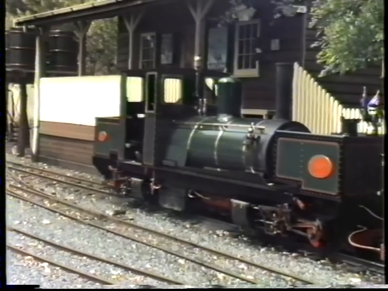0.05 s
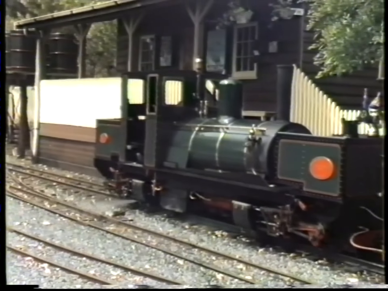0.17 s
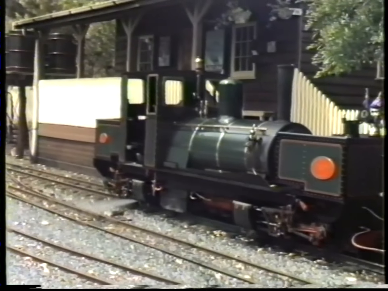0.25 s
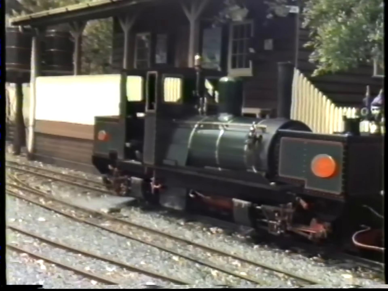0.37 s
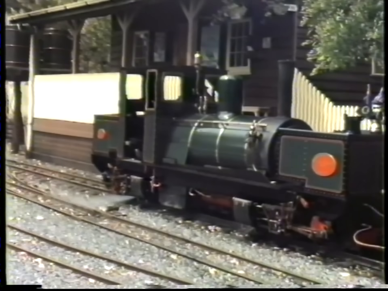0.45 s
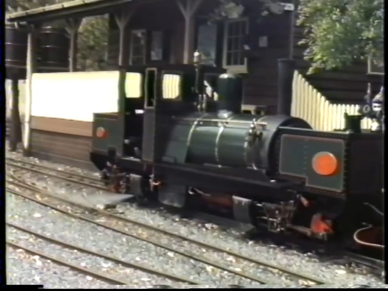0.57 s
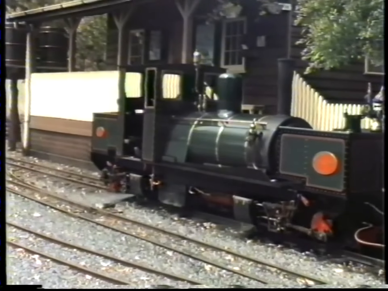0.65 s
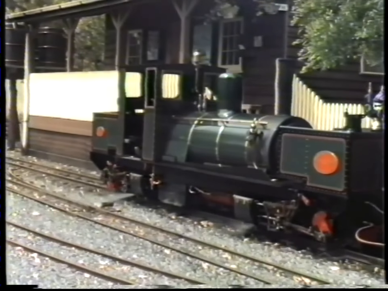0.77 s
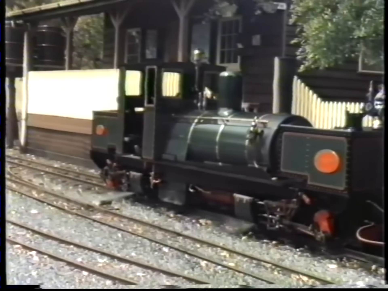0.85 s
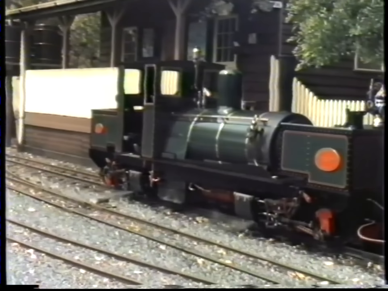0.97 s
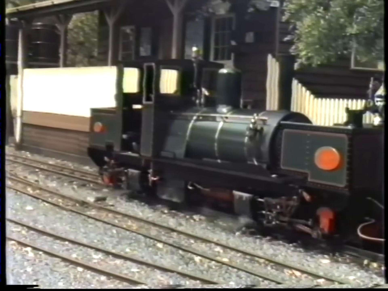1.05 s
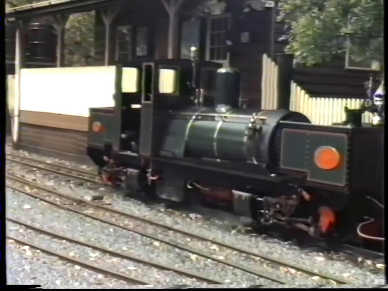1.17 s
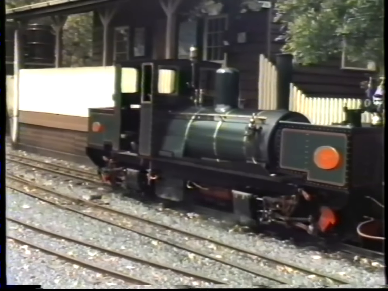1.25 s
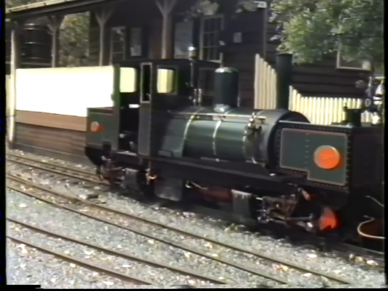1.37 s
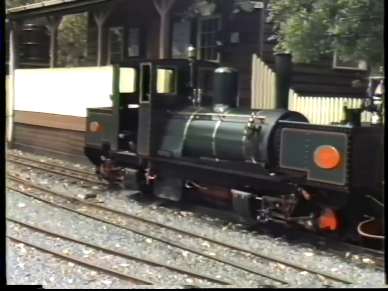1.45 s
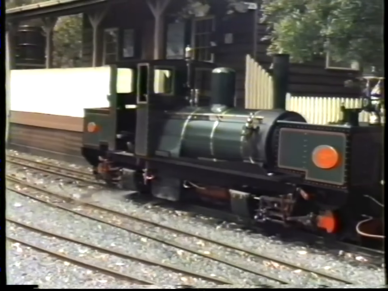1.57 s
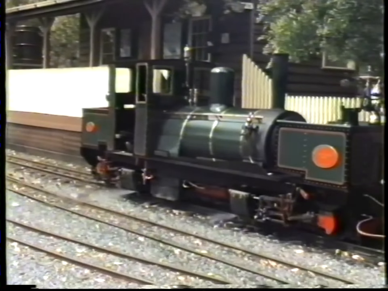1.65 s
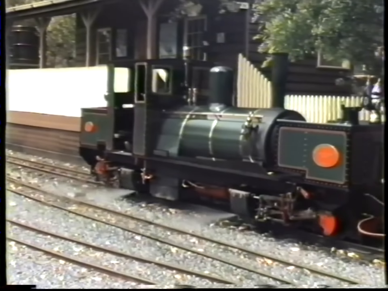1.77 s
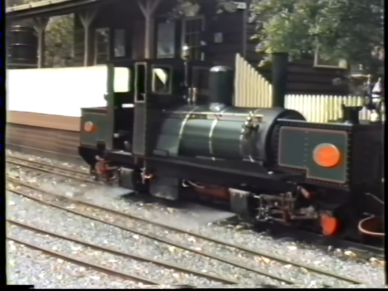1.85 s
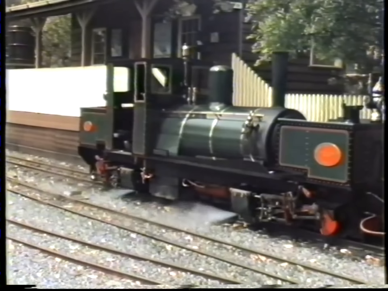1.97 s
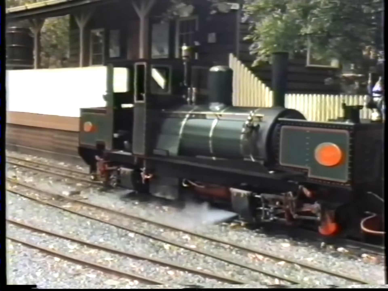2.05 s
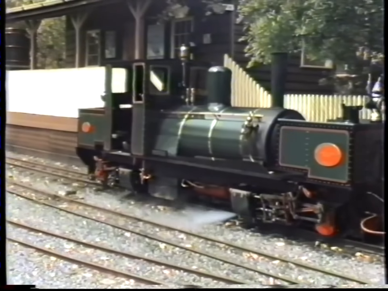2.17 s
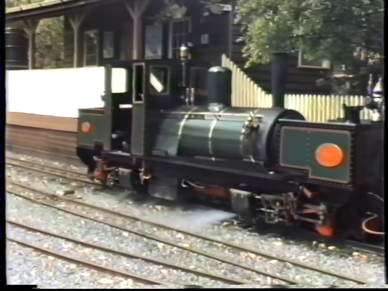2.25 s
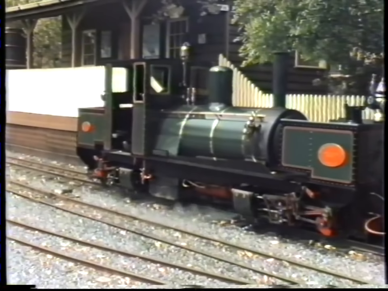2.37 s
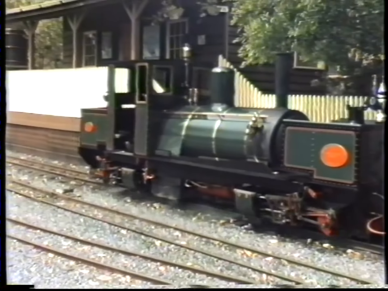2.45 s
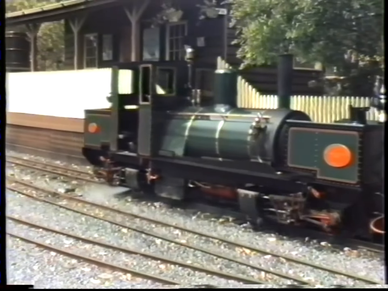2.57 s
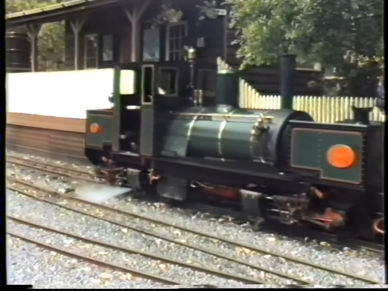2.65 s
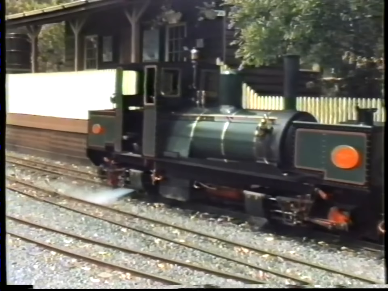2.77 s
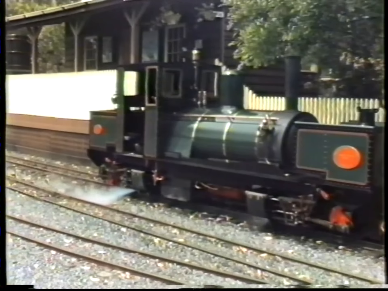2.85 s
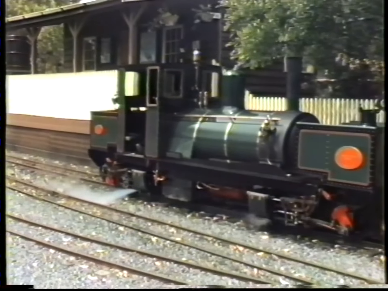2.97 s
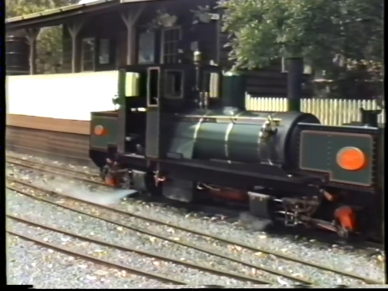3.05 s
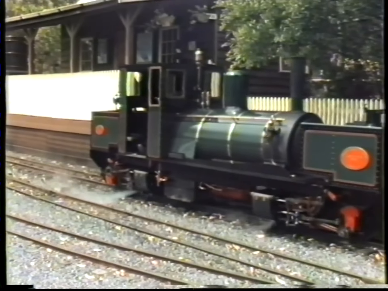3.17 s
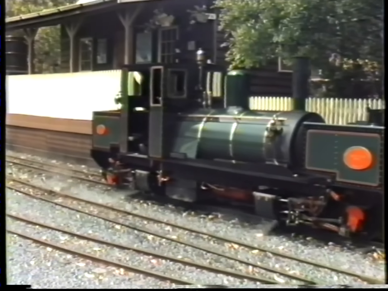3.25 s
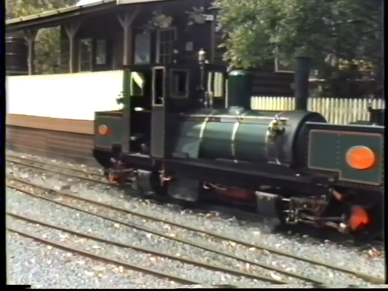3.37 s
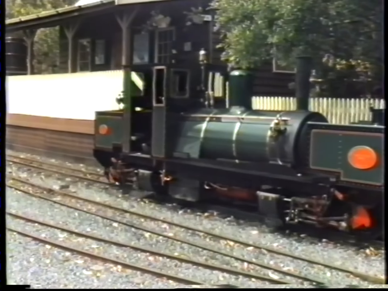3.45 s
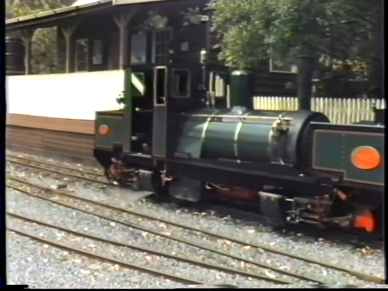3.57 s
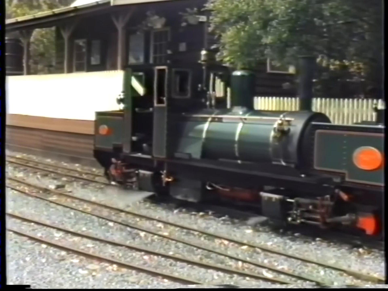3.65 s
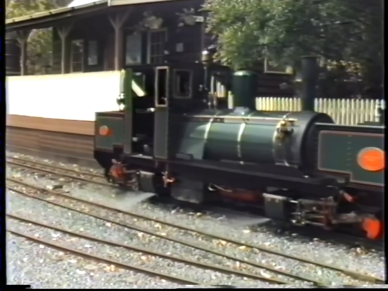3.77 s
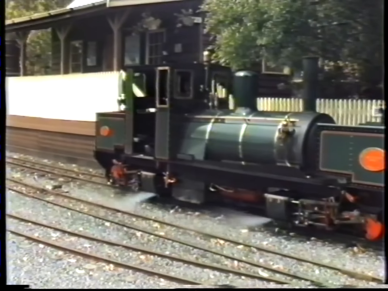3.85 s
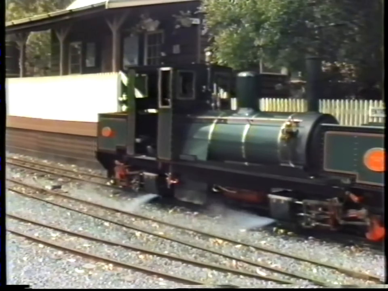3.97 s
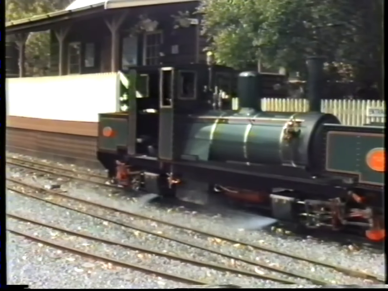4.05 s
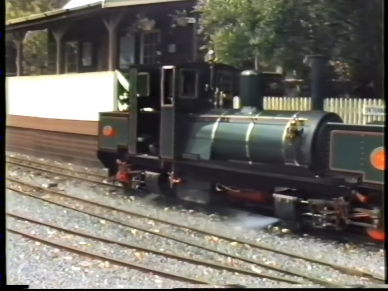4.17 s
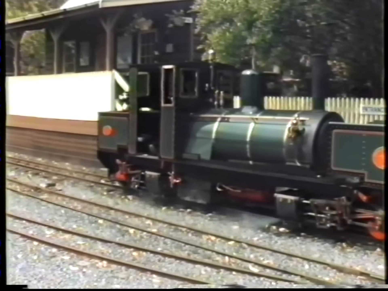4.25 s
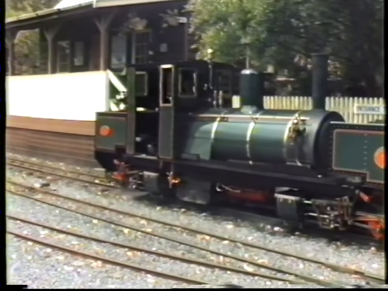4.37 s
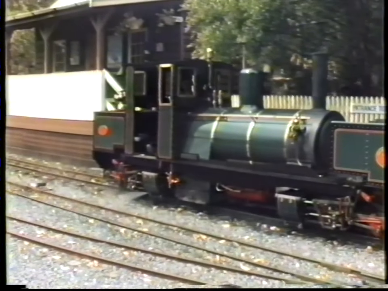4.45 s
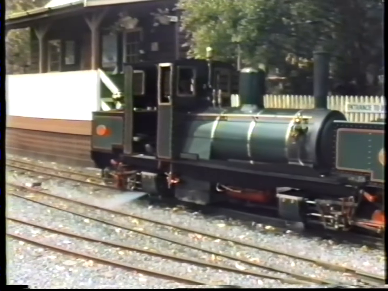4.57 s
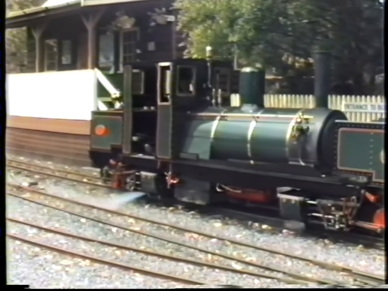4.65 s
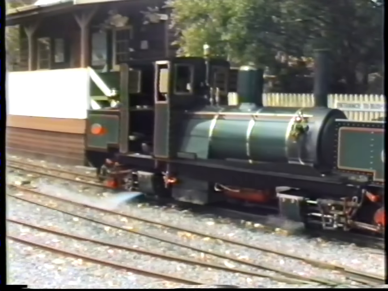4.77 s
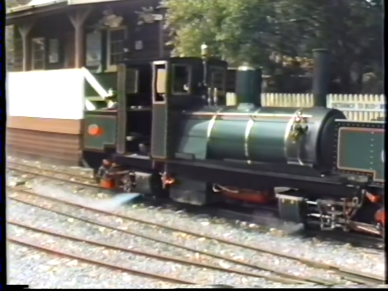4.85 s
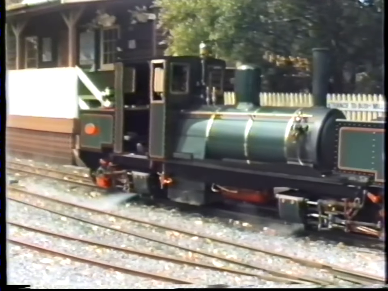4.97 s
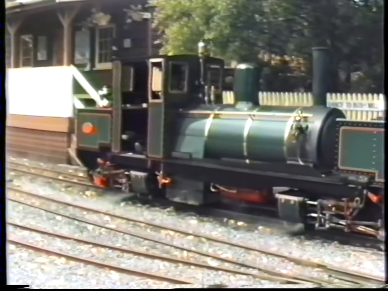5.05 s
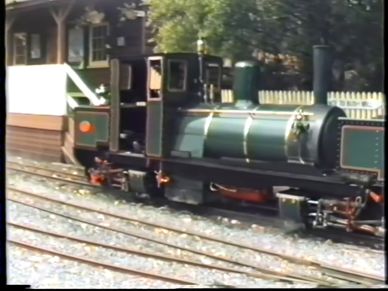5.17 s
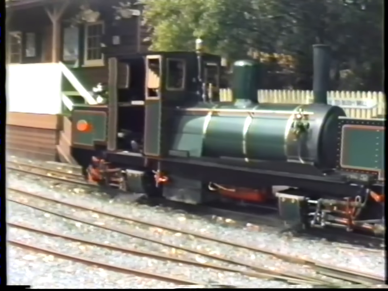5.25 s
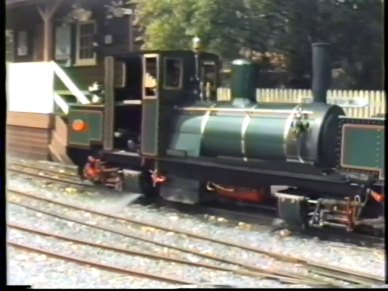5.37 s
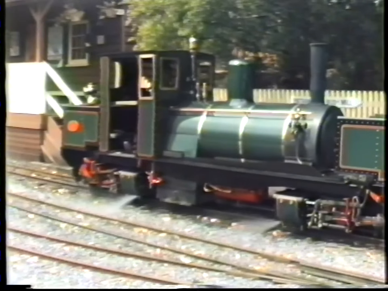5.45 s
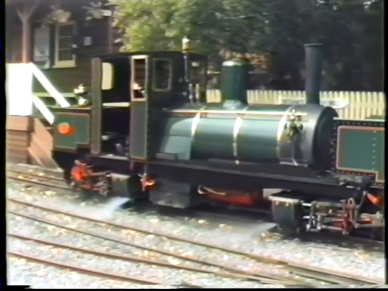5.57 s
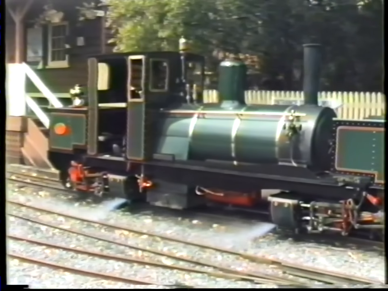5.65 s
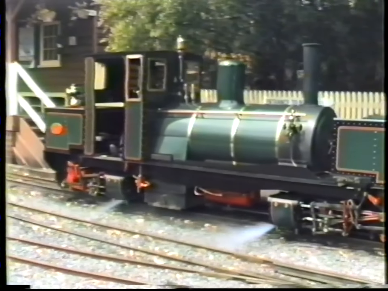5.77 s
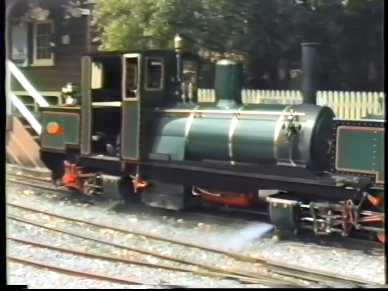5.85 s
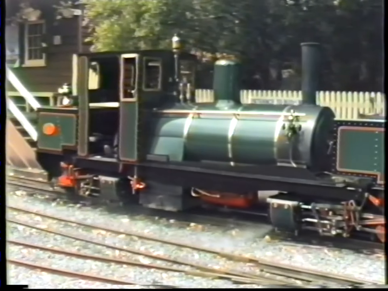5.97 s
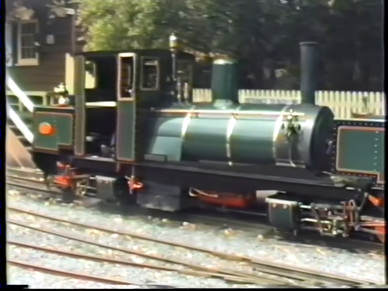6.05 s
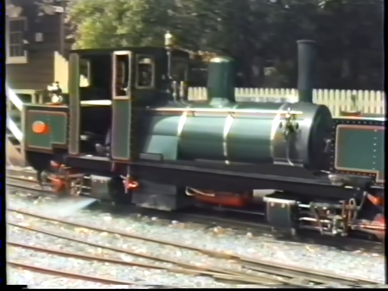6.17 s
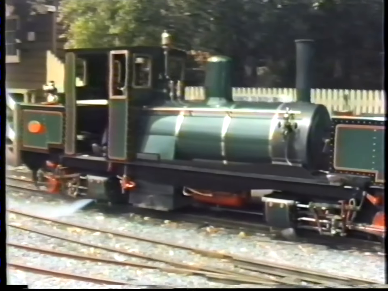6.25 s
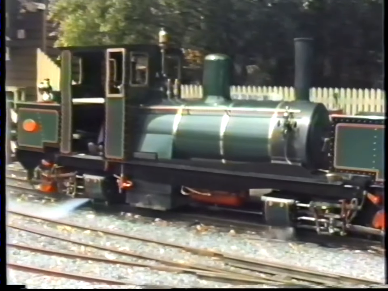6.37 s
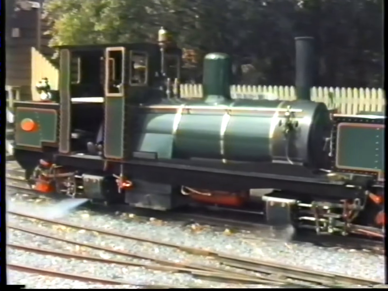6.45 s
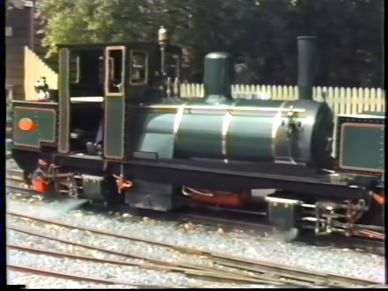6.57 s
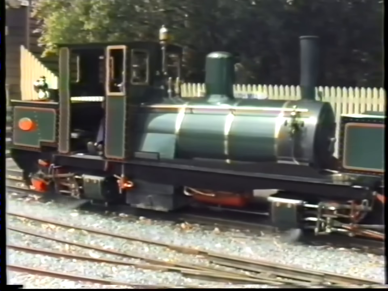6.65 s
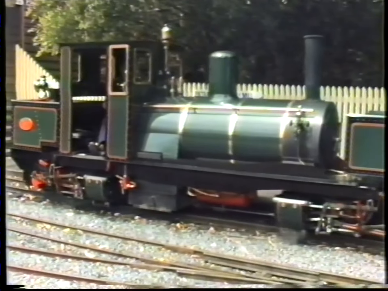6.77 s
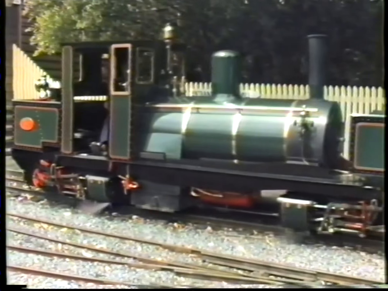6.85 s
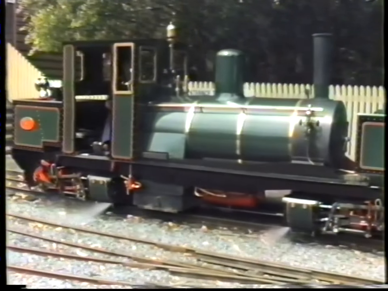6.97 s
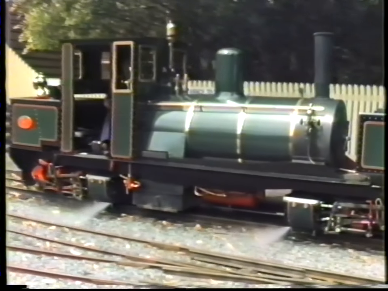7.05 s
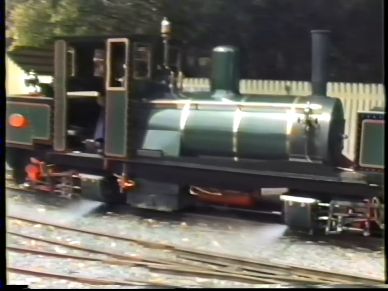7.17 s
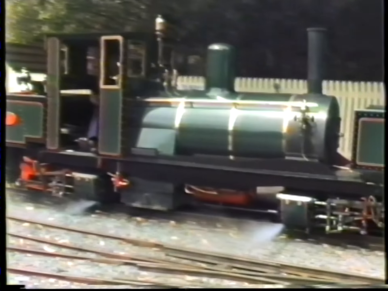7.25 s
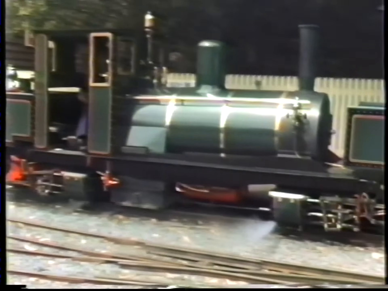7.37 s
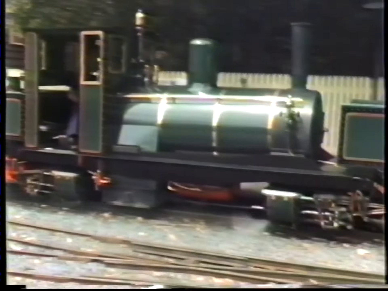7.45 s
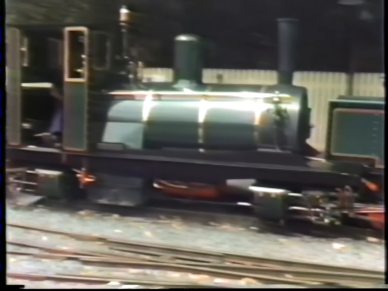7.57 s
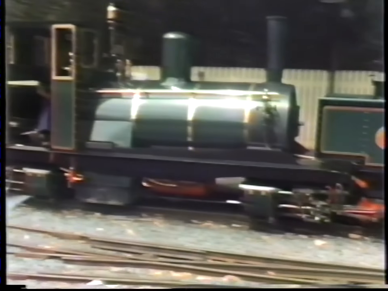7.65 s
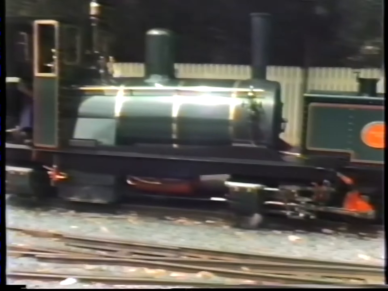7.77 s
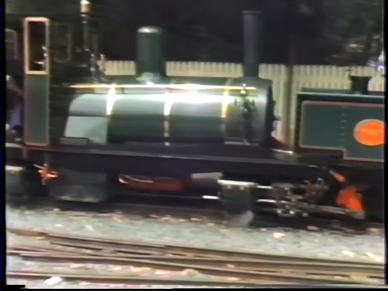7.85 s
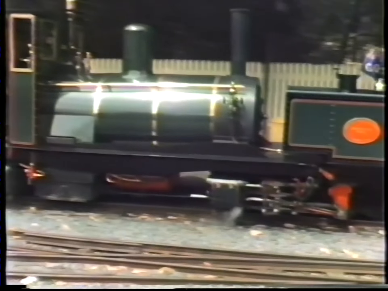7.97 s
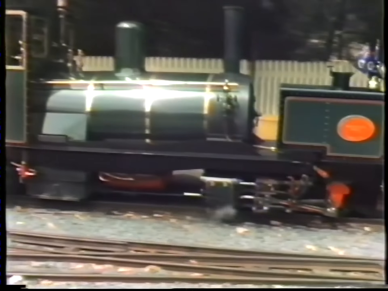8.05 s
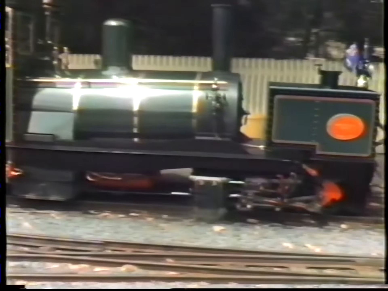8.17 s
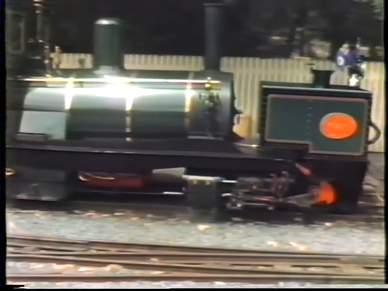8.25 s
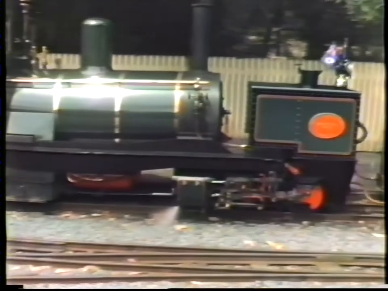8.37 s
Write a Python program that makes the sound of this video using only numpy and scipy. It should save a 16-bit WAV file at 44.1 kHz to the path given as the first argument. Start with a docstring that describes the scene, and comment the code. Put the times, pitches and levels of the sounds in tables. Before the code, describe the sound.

A small steam locomotive moves off, hissing in spitting bursts over faint chuffs and wheel rumble, with wind buffeting the microphone.

```python
"""A small steam locomotive pulls away from a station with its cylinder drain cocks open.
Steam leaks from the start, then hisses out at each piston stroke, spitting water, over short low chuffs.
After a second, gusts begin to buffet the microphone. From about four seconds the engine is nearer:
the jets blow harder, the wheels rumble louder and the wind is at its strongest.
Throughout, a mono tape camera adds hum, hiss and its line-scan whine."""
import sys
import numpy as np
from scipy import signal
from scipy.fft import rfft, irfft, next_fast_len
from scipy.io import wavfile
from scipy.ndimage import uniform_filter1d

SR = 44100
rng = np.random.default_rng(int(sys.argv[2]) if len(sys.argv) > 2 else 0)


def generate_wav(signal):
    """Clip the signal to [-1, 1] and save it as 16-bit WAV at the path in sys.argv[1]."""
    frames = np.transpose(np.atleast_2d(signal))
    scaled = np.clip(frames, -1, 1) * 32767
    pcm = np.round(scaled).astype(np.int16)
    wavfile.write(sys.argv[1], SR, pcm)


N = 370881
SIZE = next_fast_len(N)
HZ = np.maximum(np.arange(SIZE // 2 + 1) * SR / SIZE, 1)
TICKS = np.arange(0, N + 64, 64) / SR   # envelope times in seconds


# Colour of the steam. Each row: frequency in Hz, relative level in dB.
STEAM_COLOUR = [(410, -20.5), (700, -30), (893, -13), (1720, -11), (2190, -5), (3760, -1.5), (5520, -4.5),
                (7510, -1.5), (9330, -4), (11000, -11.5), (14100, -40.5), (15000, -41)]
# Peaks in the tone of the hiss, shifting in strength from blow to blow.
# Each row: centre in Hz, half width in Hz.
HISS_PEAKS = [(1450, 310), (3900, 540), (5150, 530), (6250, 390), (7400, 780), (9000, 440)]

def steam_jets(sputter_db, patchy_db):
    """Turbulent steam; water in the cocks makes it sputter, in all bands together and in each alone."""
    roar_db, dull_db, bright_db, peaks_db = steam_levels()
    mean_db = np.mean([dull_db.mean(), bright_db.mean()])

    def level_db(hz):
        """Crossfade the envelopes of the roar (1-2.2 kHz), dull jet (2.5-5.5) and bright jet (6-11)."""
        low = np.clip(np.log2(2900 / hz) / 0.87, 0, 1)
        high = np.clip(np.log2(hz / 4300) / 1.03, 0, 1)
        parts = [(low, roar_db), (1 - low - high, dull_db), (high, bright_db)]
        return mean_db + sum(share * (db - db.mean()) for share, db in parts)

    noise, centres = coloured(STEAM_COLOUR), np.geomspace(1000, 12000, 12)
    hiss = 0
    for hz, band in zip(centres, bands(noise / irfft(noise, SIZE).std(), centres)):
        hiss += band * from_db(level_db(hz) + patchy_db * drift(7.3))
    white = rfft(rng.standard_normal(SIZE))
    for (hz, width), peak_db in zip(HISS_PEAKS, peaks_db):
        bell = 1 / (1 + ((HZ - hz) / width) ** 2)
        peak = rms_one(irfft(white * bell, SIZE)[:N])
        hiss += peak * from_db(level_db(hz) + peak_db + 2.0 * drift(14.7))
    return hiss * from_db(sputter_db * drift(20) + 0.63 * drift(88) + 1.5)


# Blows of the cocks. Each row: fullest moment, swell and fade in seconds, loss over the fade in dB,
# relative levels of roar, dull jet and bright jet in dB, then the strengths of the six hiss peaks in dB.
COCK_BLOWS = [(0.64, 0.18, .14, 4, -70, -53, -42, -12, -9, -7, -14, -30, -29),
              (0.93, 0.12, 0.13, 4, -69, -47.5, -50.5, -10, -8, -5, -9, -26, -10),
              (1.86, 0.13, 0.34, 1.2, -58.5, -40, -48, -17, -10, -12, -13, -20, -10),
              (2.08, 0.22, 0.3, 5.8, -59, -40, -34.5, -19, -20, -13, -17, -13, -12),
              (2.92, 0.43, 0.07, 1, -65, -39.5, -38, -16.5, -21, -10.5, -12, -27, -14),
              (3.8, 0.24, 0.07, 1, -56.5, -38.5, -45.5, -15, -17, -18, -28, -20, -2.5),
              (4.04, .19, 0.25, 9.6, -48.5, -31.5, -29.5, -34, -13, -17, -19, -18, -12.5),
              (4.8, 0.25, .28, 15, -53, -34, -31, -22, -10.5, -16, -18, -18, -12),
              (5.5, 0.39, 0.088, 2, -47.5, -41.5, -40, -37, -26, -17, -24, -15, -10.5),
              (5.76, 0.24, 0.25, 14, -42, -30, -28.5, -36, -13.5, -30, -13, -17, -13),
              (6.44, 0.11, 0.19, 9.2, -71, -33.5, -31, -24, -8.5, -26, -31, -12, -11),
              (7.08, 0.13, 0.092, 1.5, -45, -31, -35.5, -27, -19, -25, -30, -12, -11),
              (7.25, 0.13, 0.2, 6.7, -43, -27.5, -29.5, -25, -26, -25, -12, -5, -9),
              (7.86, 0.18, 0.16, 3.5, -53.5, -30, -24.5, -19.5, -12, -24, -30, -6.5, -21),
              (8.42, 0.13, .1, 3, -72, -38, -37.5, -31, -25, -26, -19, -7, -18)]

def blow_power(db, lead_s=0, ahead_s=0, swell_db=10, open_db_per_s=300, shut_db_per_s=700):
    """One envelope a blow: the valve opens, the steam swells, fades and dies fast as the valve shuts."""
    fullest, swell, fade, loss_db = np.transpose(COCK_BLOWS)[:4, :, None]
    t = TICKS - fullest + ahead_s
    swell = swell + lead_s
    opening_db = swell_db * (t / swell) ** 2 + open_db_per_s * np.maximum(-t - swell, 0)
    closing_db = loss_db * np.minimum(t / fade, 1) ** 2 + shut_db_per_s * np.maximum(t - fade, 0)
    return from_db(2 * (db[:, None] - np.where(t < 0, opening_db, closing_db)))


# The leak under the blows, louder as the engine nears.
# Each row: time in seconds, relative levels of roar, dull jet and bright jet in dB.
STEADY_LEAK = [(0.0, -58.5, -47, -44), (0.35, -57.5, -44, -45), (1.1, -60, -45.5, -47.5),
               (1.7, -53.5, -46.5, -47.5), (2.45, -57, -45, -48), (3.4, -52.5, -45, -44.5),
               (4.4, -52.5, -39, -39), (5.15, -51.5, -42.5, -45), (6.1, -47.5, -36.5, -36.5),
               (6.75, -47.5, -41, -40.5), (7.55, -47, -36.5, -35), (8.2, -52, -43, -41.5),
               (8.41, -44, -39, -45)]
# Tone of the leak. Each entry: strength of one hiss peak, in dB relative to the jet.
LEAK_PEAKS = [-25, -20, -16, -15.5, -11, -20]
# Tone shift during a blow. Each entry: dB one hiss peak moves over the swell, and again over the fade.
PEAK_SHIFTS = [-1, 0.1, -4.5, 2, -2.5, -0.5]
# Slugs of water spit out. Each row: peak and build-up in seconds, relative dull and bright levels in dB.
WATER_SPITS = [(0.53, 0.055, -45, -37.5), (0.61, 0.027, -52, -60), (0.705, 0.028, -43.5, -43),
               (0.865, 0.019, -43, -47), (0.945, 0.024, -46, -45), (1.45, .05, -65, -46),
               (1.97, 0.05, -41, -40), (2.215, .04, -38, -52), (2.62, 0.041, -43, -54),
               (2.94, 0.064, -36.5, -35), (3.08, 0.053, -38, -38.5), (3.19, 0.09, -36, -36.5),
               (3.35, 0.055, -46, -59), (3.5, .05, -54, -43), (3.94, 0.055, -35.5, -38),
               (4.11, 0.033, -33, -55), (4.61, .04, -41, -53), (4.86, 0.04, -44, -34),
               (5.66, 0.033, -36.5, -30.5), (5.8, .03, -41, -29), (5.89, 0.03, -30.5, -42),
               (6.28, 0.047, -33, -29.5), (6.55, 0.035, -38, -36), (7.73, 0.054, -32, -32),
               (8.09, .06, -41, -42)]

def steam_levels(dull_lead_s=0.023, roar_ahead_s=0.069):
    """Leak, blows and spits add up to envelopes in dB; the loudest jet weighs most in the hiss peaks."""
    times, *leak_db = np.transpose(STEADY_LEAK)
    roar, dull, bright = [from_db(2 * np.interp(TICKS, times, db)) for db in leak_db]
    fullest, swell, fade, _, roar_db, dull_db, bright_db, *blow_peaks = np.transpose(COCK_BLOWS)
    dull_spits, bright_spits = bursts(WATER_SPITS, break_share=0.29)
    bright_blows = blow_power(bright_db)
    all_bright = bright + bright_blows.sum(axis=0)
    t = TICKS - fullest[:, None]
    progress = np.clip(t / np.where(t < 0, swell[:, None], fade[:, None]), -1, 1)   # -1 opening, 1 shut
    peaks_db = []
    for leak_peak_db, blow_peak_db, shift_db in zip(LEAK_PEAKS, blow_peaks, PEAK_SHIFTS):
        from_leak = from_db(2 * leak_peak_db) * bright
        from_blows = from_db(2 * (blow_peak_db[:, None] + shift_db * progress)) * bright_blows
        peaks_db.append(to_db((from_leak + from_blows.sum(axis=0)) / all_bright))
    # The dull jet starts before the bright one; the roar runs ahead altogether.
    dull += blow_power(dull_db, dull_lead_s).sum(axis=0) + dull_spits
    roar += blow_power(roar_db, dull_lead_s, roar_ahead_s).sum(axis=0)
    return to_db(roar), to_db(dull), to_db(all_bright + bright_spits), peaks_db


# Chuffs of the engine. Each row: start in seconds, relative level in dB, length in seconds,
# centre of the tone in Hz.
CHUFFS = [(0.205, -38, 0.018, 600), (0.586, -40, 0.032, 480), (2.745, -34.5, 0.039, 654),
          (3.951, -43, 0.029, 450), (4.621, -29.5, 0.04, 650), (6.252, -28.5, 0.047, 850),
          (7.507, -34.5, 0.064, 750)]
# Body of a chuff. Each row: frequency in Hz, relative level in dB, seconds to die away by 60 dB.
CHUFF_TONES = [(346, -3.5, 0.12), (430, -12, 0.063), (454, 1.5, 0.03), (562, 0, 0.043), (822, 1.5, 0.063),
               (860, -5.5, 0.06), (1030, -1.5, 0.03), (1252, 1, 0.082), (1530, -8, 0.023)]

def engine_chuffs(clicks_per_s=1500):
    """Short, noisy, low chuffs, about once a wheel turn: dying bursts of clicks through damped filters."""
    out = np.zeros(N)
    t = np.arange(SR // 2) / SR
    for start, db, length, centre_hz in CHUFFS:
        at = round(start * SR)
        burst = (rng.random(len(t)) < clicks_per_s / SR) * np.exp(-(t / length) ** 2)
        for hz, tone_db, t60 in CHUFF_TONES:
            strength = from_db(db + tone_db - 21 - 7.0 * np.log2(hz / centre_hz) ** 2)
            clicks = strength * burst * rng.standard_normal(len(t)) + 1e-18
            decay, angle = from_db(-60 / (t60 * SR)), 2 * np.pi * hz / SR
            body = signal.lfilter([0, np.sin(angle)], [1, -2 * decay * np.cos(angle), decay ** 2], clicks)
            out[at:at + len(body)] += body[:N - at]
    return out


# Strength of the wind on the microphone. Each row: time in seconds, level in dB.
WIND_GUSTS = [(0.0, -82), (0.7, -65), (1.25, -52.5), (1.55, -51), (1.8, -54.5), (2.1, -57), (2.7, -66.5),
              (3.45, -58.5), (3.9, -51), (4.4, -48), (4.6, -39.5), (4.77, -39), (4.84, -48), (5.2, -44),
              (5.5, -42), (6.0, -42.5), (6.45, -47), (7.22, -43.5), (7.32, -54.5), (7.85, -44),
              (8.02, -52.5), (8.3, -61), (8.41, -55)]
# Thumps of single eddies. Each row: peak in seconds, build-up in seconds, level in dB.
EDDY_THUMPS = [(0.42, .02, -60), (0.6, 0.034, -60), (1.32, 0.036, -48), (1.51, .04, -49.5), (1.7, .03, -50),
               (1.78, .025, -53), (1.89, .025, -61), (3.22, .02, -59), (3.96, 0.027, -43.5),
               (4.13, 0.019, -38), (4.21, .03, -44), (4.36, 0.02, -42), (4.51, 0.037, -42),
               (4.76, .04, -39), (4.93, 0.043, -44.5), (5.12, 0.023, -36), (5.32, 0.023, -40),
               (5.41, 0.033, -39), (5.56, 0.031, -39), (5.94, .03, -36), (6.02, .03, -41),
               (6.15, 0.044, -43), (6.31, 0.027, -45), (6.62, .07, -38), (6.95, 0.019, -36),
               (7.2, 0.019, -37.5), (7.62, 0.037, -51), (7.83, 0.049, -40), (8.09, 0.035, -44.5),
               (8.22, .025, -54)]
# Colour of the buffeting. Each row: frequency in Hz, relative level in dB.
WIND_COLOUR = [(15, -52), (25, -28), (66, -3), (97, -0.5), (199, -5), (325, -12), (436, -21), (600, -19),
               (780, -24.5), (1320, -120)]

def wind(lumpy_db, patchy_db, evening=0.33):
    """Eddies thud on the microphone in lumps, their slow swings evened so the gusts set the loudness."""
    gust_power = from_db(2 * np.interp(TICKS, *np.transpose(WIND_GUSTS)))
    gust_db = to_db(gust_power + bursts(EDDY_THUMPS, break_share=1)[0])
    centres, noise = np.geomspace(40, 480, 6), coloured(WIND_COLOUR)
    lumps = 0
    for hz, band in zip(centres, bands(noise, centres)):
        # Strong gusts thump lower.
        deeper_db = -.08 * (gust_db - gust_db.mean()) * max(np.log2(hz / 130), 0)
        lumps += band * from_db(deeper_db + patchy_db * drift(14))
    slow_power = uniform_filter1d(lumps ** 2, size=SR // 24) + 1e-20
    return rms_one(lumps / slow_power ** evening) * from_db(gust_db + lumpy_db * drift(19))


# Swell of the rolling wheels and frames. Each row: time in seconds, relative level in dB.
RUMBLE_LEVELS = [(0.0, -62.5), (1.01, -66), (1.19, -60), (5.13, -54.5), (5.46, -54.5), (6.09, -51.5),
                 (6.37, -57), (6.91, -50), (8.41, -56)]
# Colour of the rumble. Each row: frequency in Hz, relative level in dB.
RUMBLE_COLOUR = [(150, -12), (300, 0.5), (500, 4), (900, 4), (1400, -4), (2200, -18), (4000, -16)]

def wheel_rumble():
    """Iron rolls on rails with a dull, uneven rumble."""
    return steady_noise(RUMBLE_COLOUR) * from_db(envelope(RUMBLE_LEVELS) + 1.5 + 2.0 * drift(10.6))


# Whine of the line scan. Each row: time in seconds, rms level in dB.
WHINE_LEVELS = [(0.0, -51.5), (1.69, -50), (4.94, -50.5), (5.04, -51), (8.41, -51.5)]
# Field-rate sidebands. Each row: offset in Hz, level in dB relative to the whine.
WHINE_SIDEBANDS = [(-150, -36), (-100, -30), (-50, -33), (50, -37), (100, -35)]
# Mains hum. Each row: frequency in Hz, rms level in dB.
MAINS_HUM = [(100, -65), (250, -74)]
# Colour of the tape hiss. Each row: frequency in Hz, relative level in dB.
TAPE_COLOUR = [(40, 5.5), (200, 0), (2000, -7.5), (9000, -12), (12000, -15), (14000, -14), (15700, -20)]

def camera_noise(whine_hz=15625, hiss_db=-57.5):
    """The tape hisses, the mains hum and the line scan whines."""
    t = np.arange(N) / SR
    phase = 2 * np.pi * whine_hz * t + .4 * drift(2) + .03 * drift(40)   # the tape speed wavers
    sidebands = sum(from_db(db) * np.sin(phase + 2 * np.pi * hz * t) for hz, db in WHINE_SIDEBANDS)
    whine = from_db(envelope(WHINE_LEVELS)) * (np.sin(phase) + sidebands)
    hum = sum(from_db(db) * np.sin(2 * np.pi * hz * t) for hz, db in MAINS_HUM)
    hiss = from_db(hiss_db) * steady_noise(TAPE_COLOUR)
    return hiss + np.sqrt(2) * (hum + whine)


def from_db(db):
    """Amplitude of a level; twice the level gives its power."""
    return 10 ** (np.asarray(db) / 20)


def to_db(power):
    """Turn a power at the ticks into a level at every sample."""
    return np.interp(np.arange(N) / SR, TICKS, 10 * np.log10(power))


def rms_one(x):
    return x / np.sqrt(np.mean(x ** 2) + 1e-20)


def envelope(rows):
    return np.interp(np.arange(N) / SR, *np.transpose(rows))


def bursts(rows, break_share):
    """A power envelope for each level column; bursts break off in a share of their build-up time."""
    peak_s, rise, *levels = np.transpose(rows)[:, :, None]
    t = (TICKS - peak_s) / rise
    shape = np.exp(-np.where(t < 0, t, t / break_share) ** 2)
    return [np.sum(from_db(2 * db) * shape, axis=0) for db in levels]


def drift(hz):
    """Slow random wander of spread 1: noise at every 40th sample through a double one-pole low-pass."""
    pole = np.exp(-80 * np.pi * hz / SR)
    slow = signal.lfilter([1], [1, -2 * pole, pole ** 2], rng.standard_normal(N // 40 + 2002))[2000:]
    return np.interp(np.arange(N) / 40, np.arange(len(slow)), rms_one(slow))


def coloured(colour):
    """Spectrum of a noise with the given colour."""
    hz, db = np.transpose(colour)
    return rfft(rng.standard_normal(SIZE)) * from_db(np.interp(np.log(HZ), np.log(hz), db))


def steady_noise(colour):
    return rms_one(irfft(coloured(colour), SIZE)[:N])


def bands(spectrum, centres):
    """Overlapping slices, evenly spaced in pitch, that add up to the whole sound."""
    place = np.interp(np.log(HZ), np.log(centres), np.arange(len(centres)))
    for k in range(len(centres)):
        yield irfft(spectrum * np.cos(np.pi / 2 * np.clip(place - k, -1, 1)) ** 2, SIZE)[:N]


def scene():
    """Steam in front; wind, chuffs, wheels and camera noise behind, all in mono."""
    steam = steam_jets(sputter_db=0.57, patchy_db=0.89)
    buffeting = wind(lumpy_db=1.33, patchy_db=2.0)
    mono = steam + buffeting + engine_chuffs() + wheel_rumble() + camera_noise()
    return np.array([mono, mono])


def record(dry):
    """The microphone drops the deep bass, the tape rounds the peaks, the top is cut steeply."""
    bass_cut_hz, tape_ceiling, top_cut_hz = 41, 0.27, 15740
    thin = signal.sosfilt(signal.butter(2, bass_cut_hz, "high", fs=SR, output="sos"), dry)
    taped = tape_ceiling * np.tanh(thin / tape_ceiling)
    return signal.sosfilt(signal.ellip(14, .2, 70, top_cut_hz, fs=SR, output="sos"), taped)


dry = scene()
out = record(dry)
generate_wav(out)
```